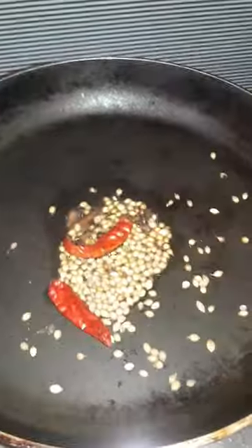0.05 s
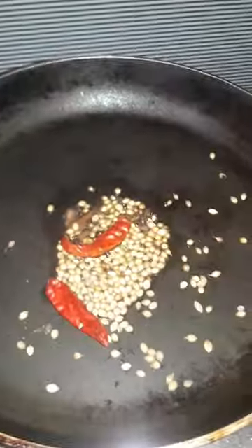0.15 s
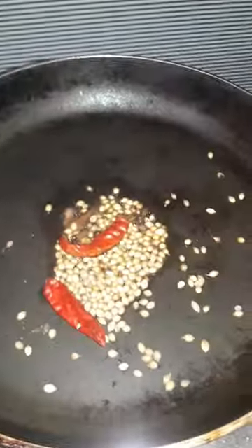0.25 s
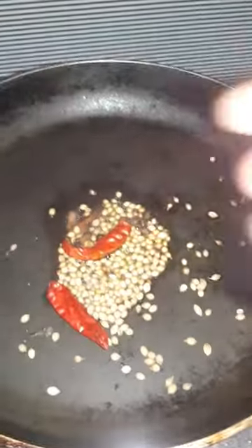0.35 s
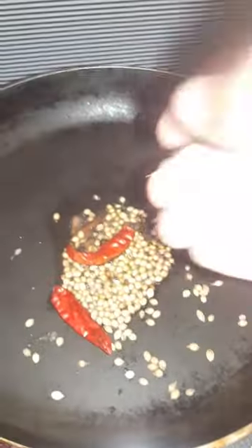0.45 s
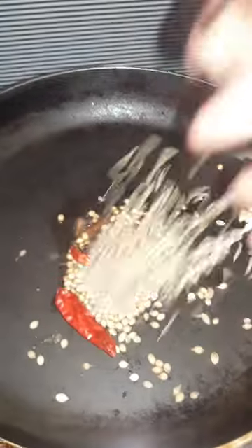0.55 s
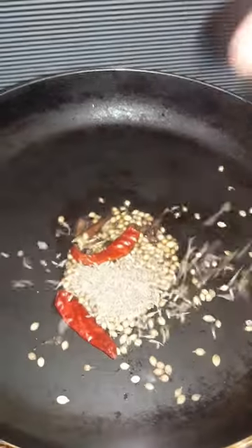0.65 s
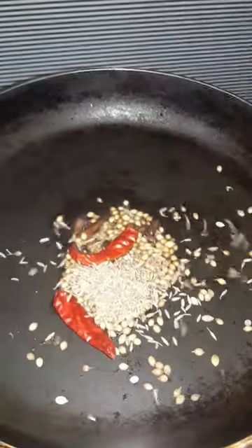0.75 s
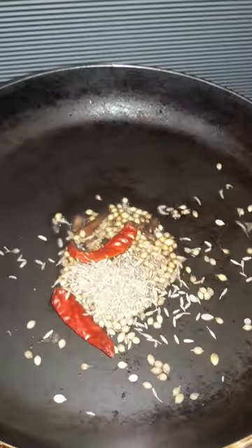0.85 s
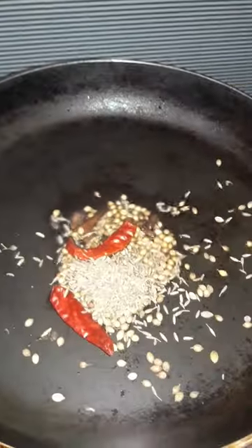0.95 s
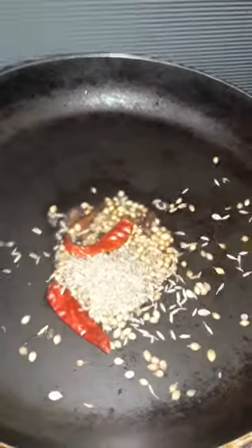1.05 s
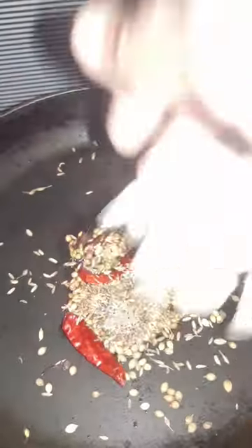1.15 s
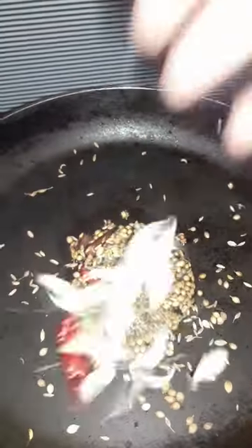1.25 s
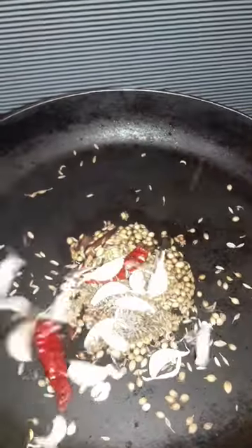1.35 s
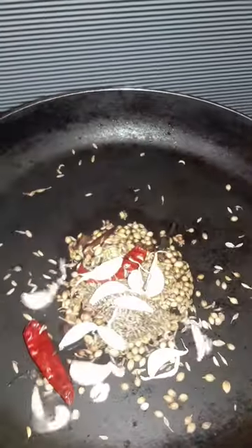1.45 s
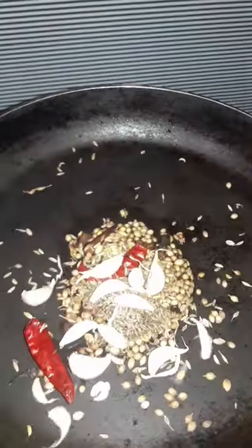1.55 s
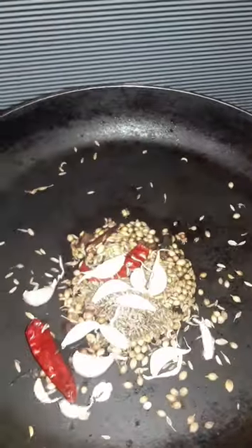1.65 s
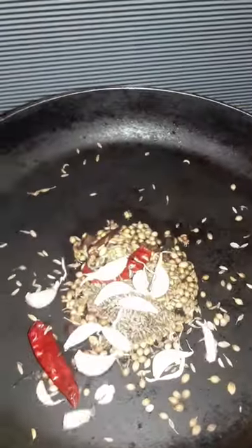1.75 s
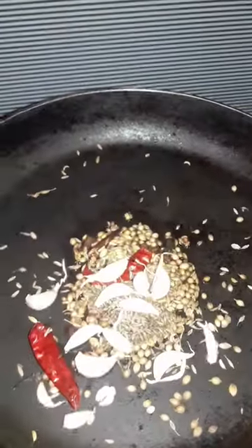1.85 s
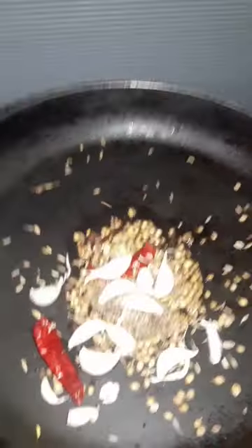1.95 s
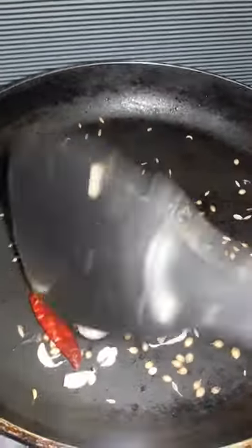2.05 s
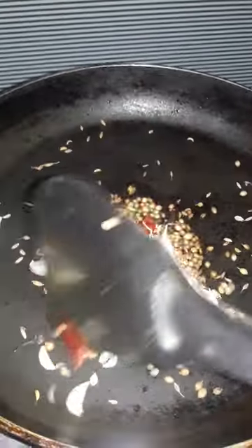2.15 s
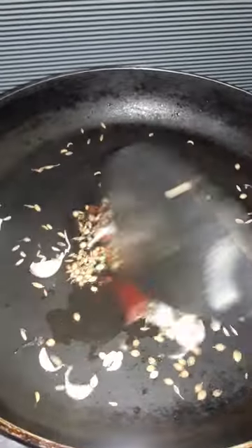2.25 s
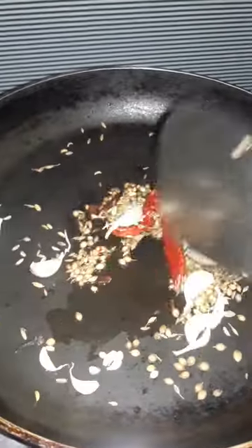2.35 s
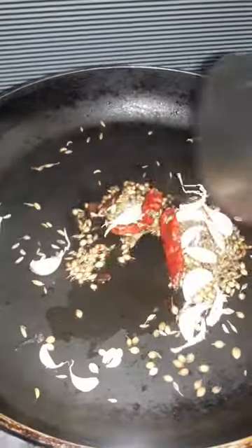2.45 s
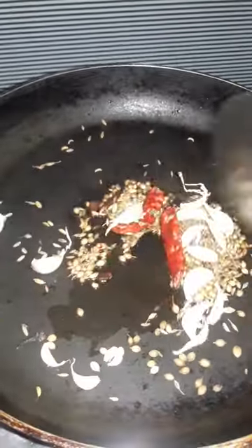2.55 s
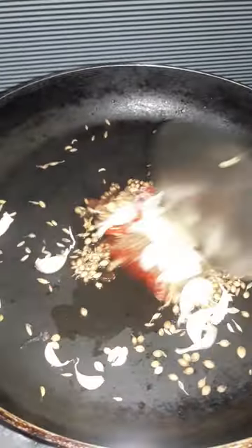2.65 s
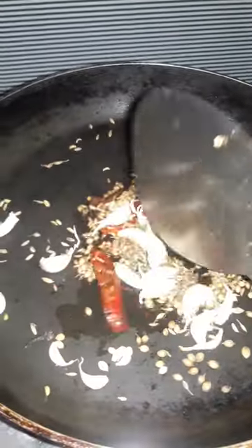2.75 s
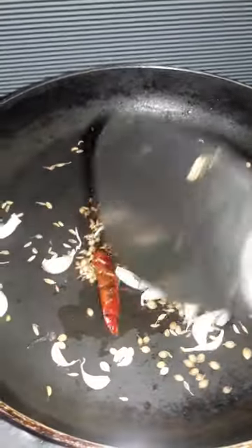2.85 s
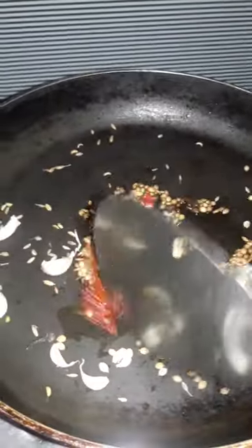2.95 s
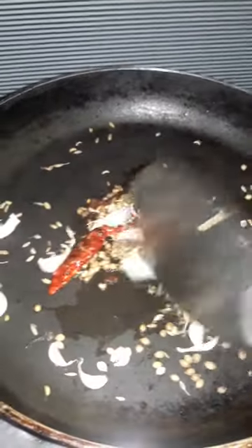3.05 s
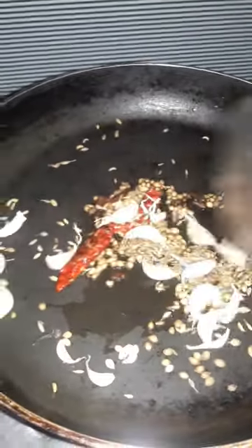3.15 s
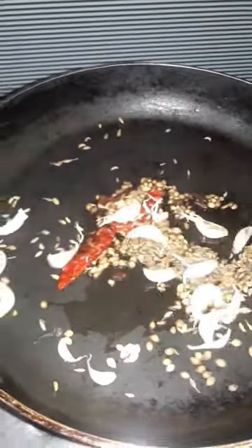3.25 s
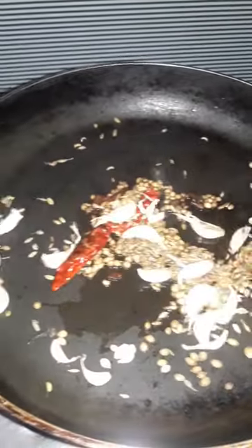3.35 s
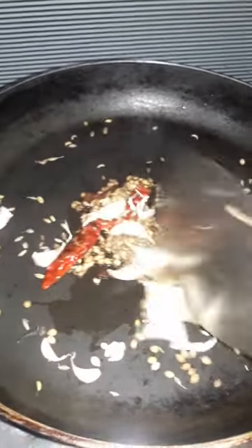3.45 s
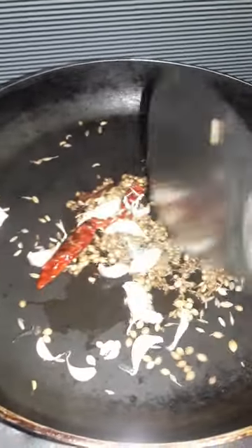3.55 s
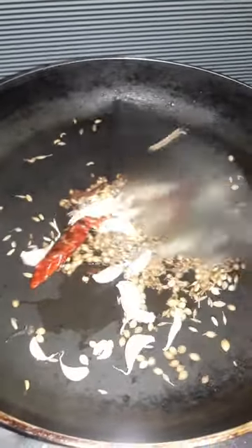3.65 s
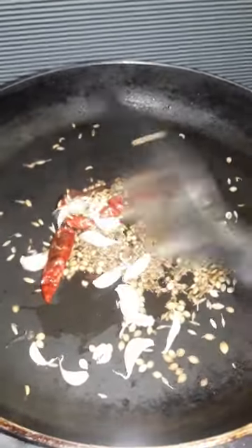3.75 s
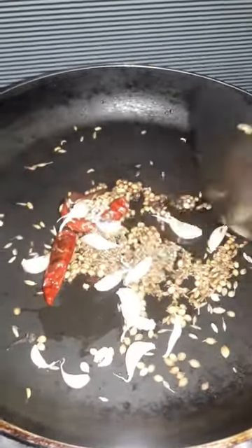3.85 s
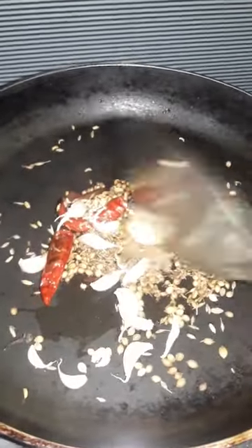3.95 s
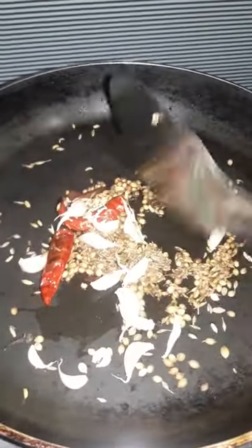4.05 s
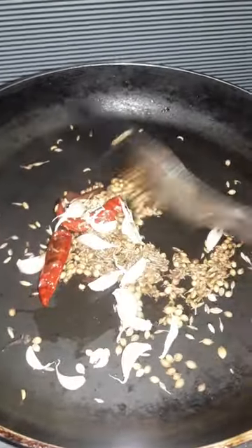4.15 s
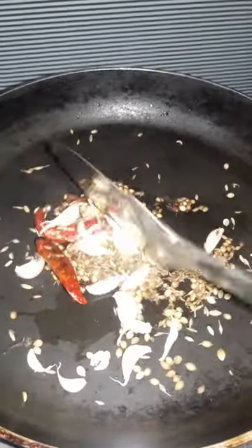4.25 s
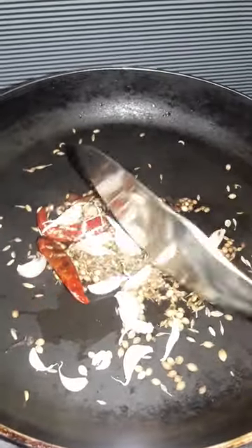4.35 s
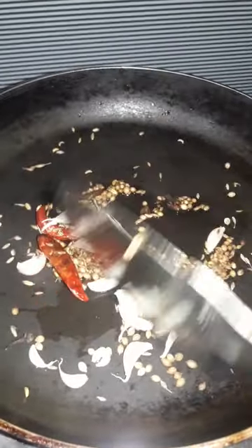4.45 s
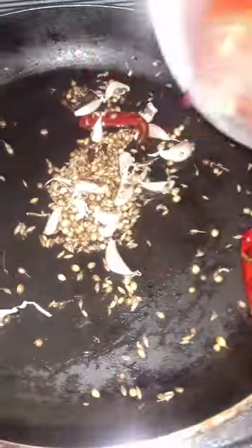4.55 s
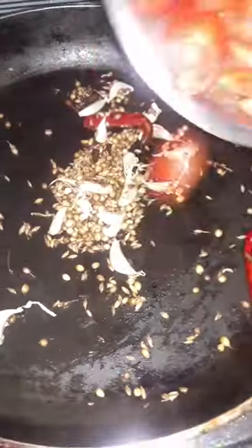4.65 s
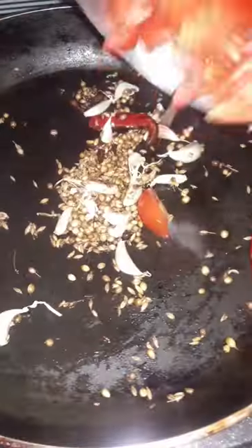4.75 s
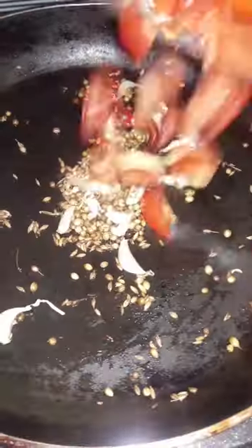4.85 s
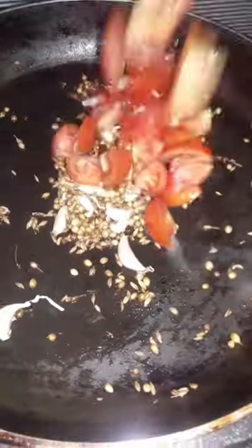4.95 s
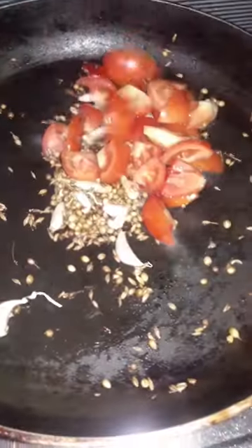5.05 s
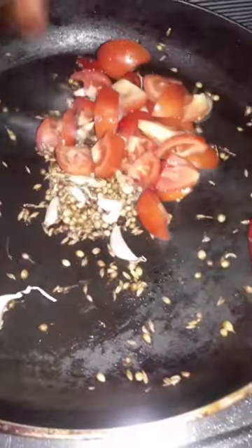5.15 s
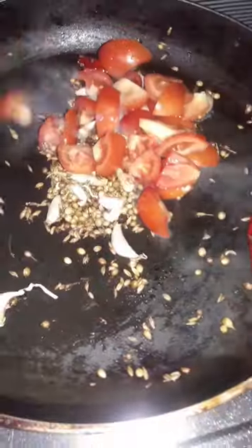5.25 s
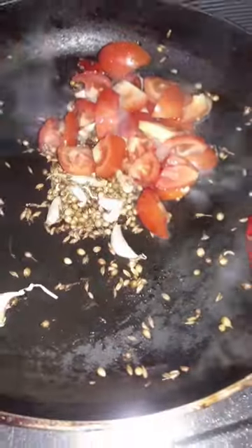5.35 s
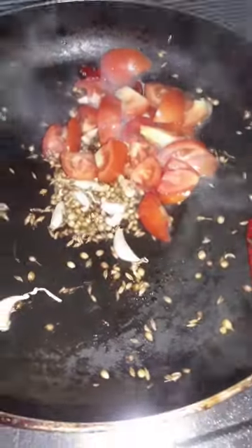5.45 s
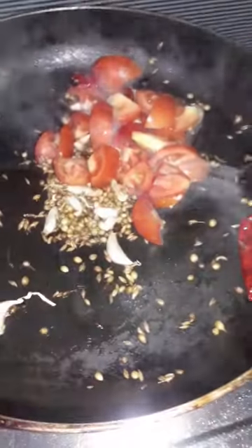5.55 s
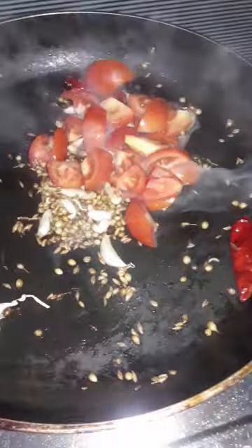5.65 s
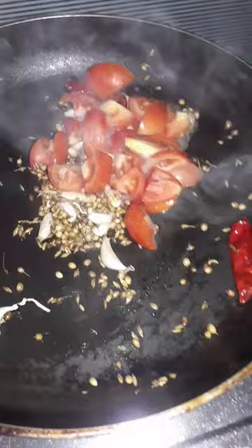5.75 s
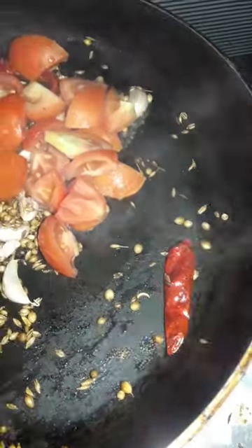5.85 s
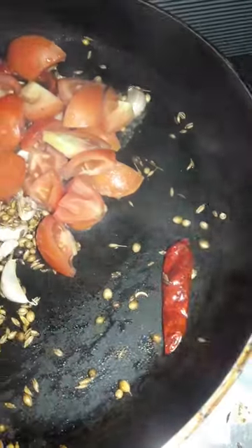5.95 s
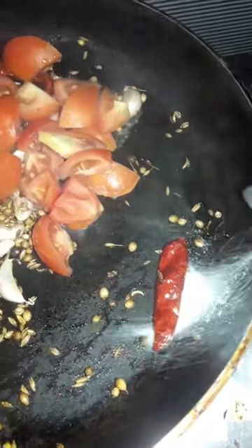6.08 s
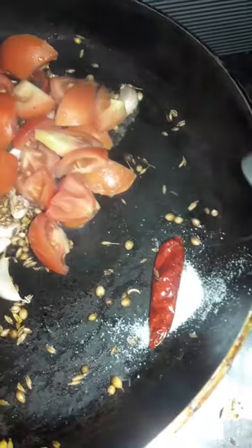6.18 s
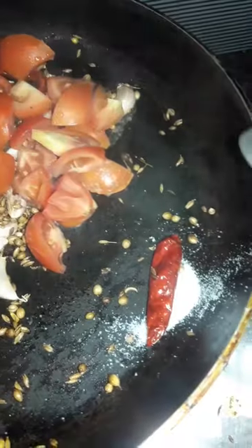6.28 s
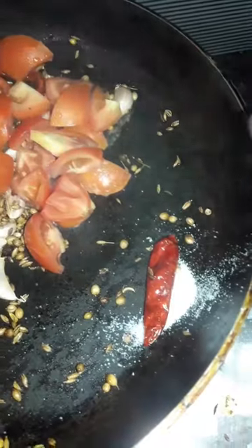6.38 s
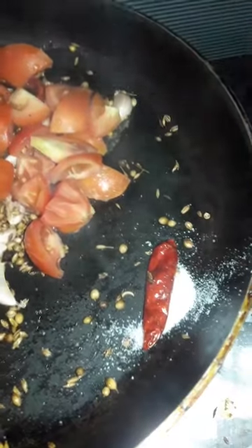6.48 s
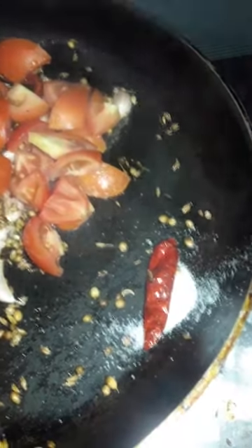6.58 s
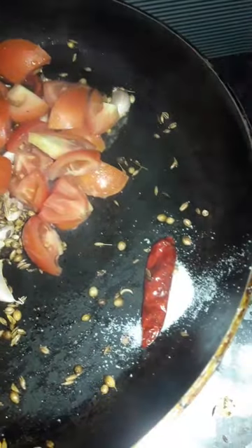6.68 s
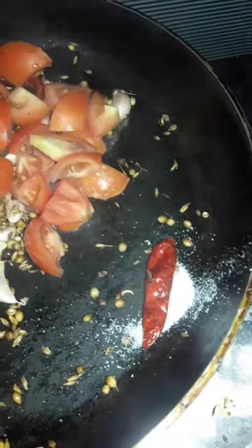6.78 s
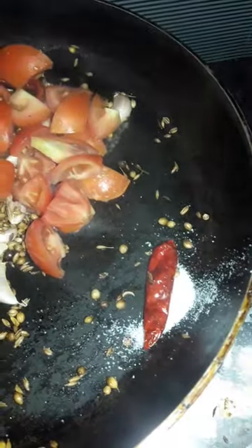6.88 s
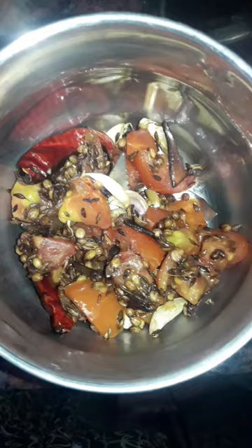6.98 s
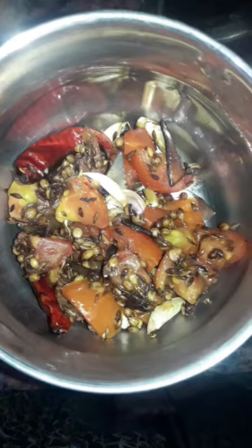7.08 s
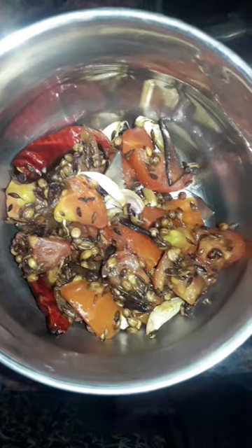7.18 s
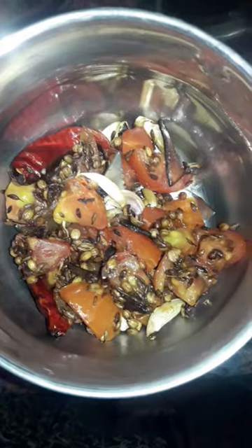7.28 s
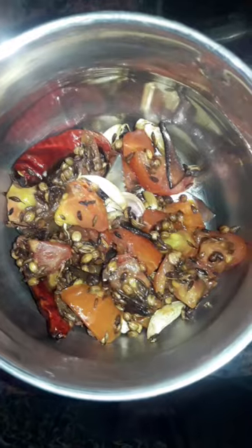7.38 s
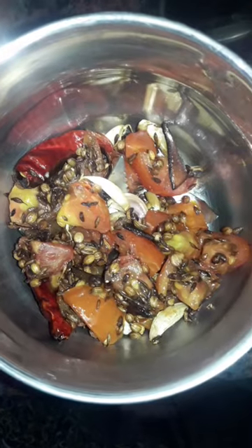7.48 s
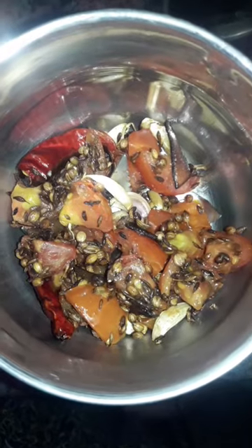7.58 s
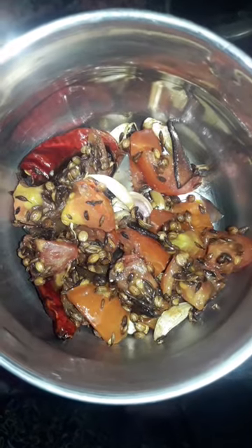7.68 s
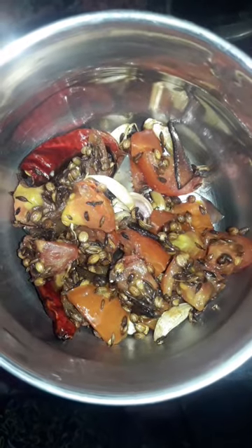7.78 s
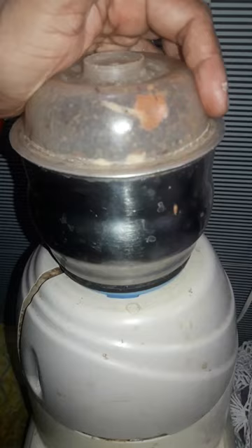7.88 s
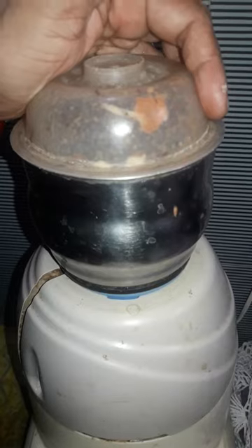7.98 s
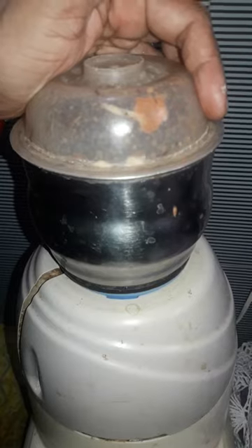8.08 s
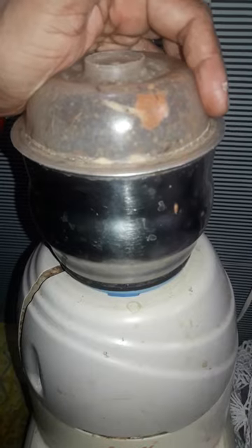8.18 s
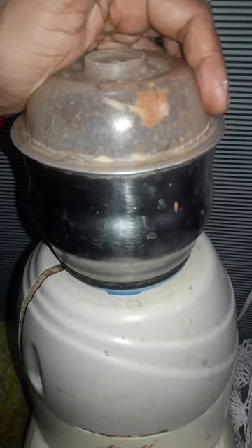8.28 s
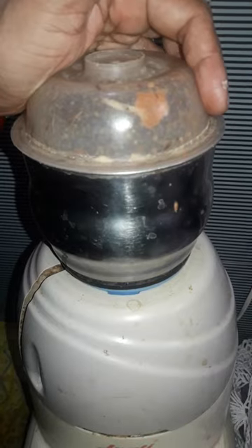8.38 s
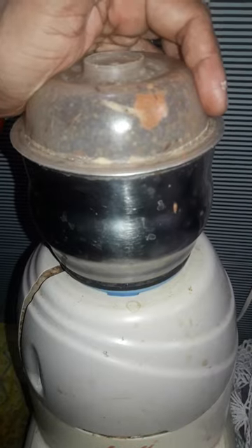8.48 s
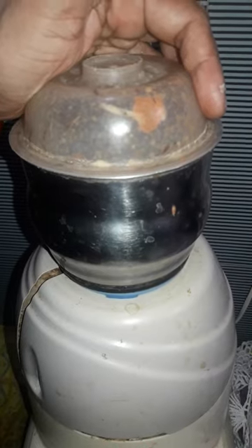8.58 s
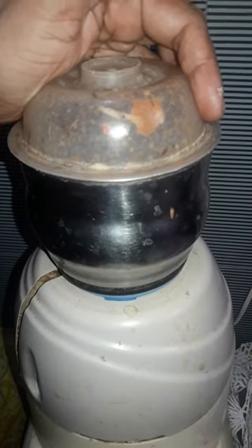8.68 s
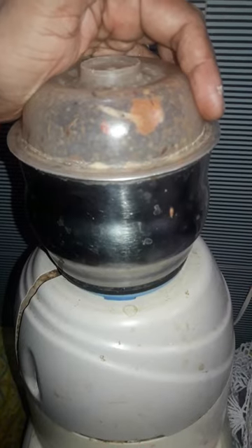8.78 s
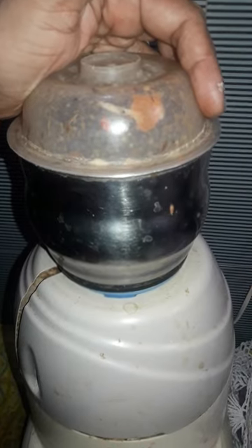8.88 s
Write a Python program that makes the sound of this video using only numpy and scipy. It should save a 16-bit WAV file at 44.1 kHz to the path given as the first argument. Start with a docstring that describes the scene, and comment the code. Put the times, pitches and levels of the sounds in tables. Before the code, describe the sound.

Close, dry home-kitchen sound over a steel pan. Two faint spoon taps and trickling seeds, a sharp spoon clack, then a bright ringing bowl clink and garlic pattering down. A spatula scrapes, ticks and knocks through the seeds. Wet tomato lands and bursts into loud steam hiss, easing slightly. An abrupt cut leaves dull room noise with small jar bumps, then a loud grinder runs steadily to the end.

```python
"""Two faint spoon taps and a trickle of seeds over soft room noise, close above a steel pan; hard cuts join the shots.
Seeds and garlic drop in, a small bowl clinks, a spatula knocks and scrapes, wet tomato bursts into a steam hiss,
a jar is handled quietly, then a grinder runs at full speed. Struck things are sums of decaying sine modes;
seeds, scrapes, steam and blades are grainy noise shaped by spectra and resonances. Both channels are alike."""
import sys
import numpy as np
from scipy import signal
from scipy.fft import rfft, irfft, next_fast_len
from scipy.io import wavfile
from scipy.ndimage import uniform_filter1d

SR = 44100
rng = np.random.default_rng(int(sys.argv[2]) if len(sys.argv) > 2 else 0)


def transcribe(u):
    """Save the signal u as a 16-bit wav file named by the first command-line argument.

    u: samples, shape (n,) or (channels, n), limited to [-1, 1]; the rate is SR.
    q: integer samples, one column per channel.
    """
    v = np.clip(np.atleast_2d(u).T, -1, 1)
    q = np.round(v * 32767).astype(np.int16)
    wavfile.write(sys.argv[1], SR, q)


def makeup_ratio(level_db):
    """Linear amplitude ratio for a level in decibels (20 dB per factor of ten)."""
    decades = np.asarray(level_db, float) / 20
    return 10 ** decades


N = 393372
T = np.arange(N) / SR


def evened(x):
    """Normalisation: scales a signal to rms 1."""
    return x / np.sqrt(np.mean(x ** 2) + 1e-20)


def read(points, hz):
    """Interpolation: reads a spectrum in dB on a log-frequency axis."""
    f, value = np.transpose(points)
    return np.interp(np.log(hz + 1), np.log(f + 1), value)


def colour(x, spectrum):
    """Linear filtering: weights the Fourier components by a spectrum, result at rms 1."""
    size = next_fast_len(len(x))
    gain = makeup_ratio(read(spectrum, np.fft.rfftfreq(size, 1 / SR)))
    return evened(irfft(rfft(x, size) * gain, size)[:len(x)])


def resonate(x, hz, width):
    """Resonance by heterodyning: shifts hz down to zero, smooths, and shifts back; gain 1 at the peak."""
    carrier = np.exp(2j * np.pi * np.cumsum(hz * np.ones(len(x))) / SR)
    r = np.exp(-np.pi * width / SR)
    return 2 * (carrier * signal.lfilter([1 - r], [1, -r], x / carrier)).real


def top(x):
    """High-pass filtering: the treble above 8500 Hz."""
    return signal.sosfilt(signal.butter(4, 8500 / SR * 2, "high", output="sos"), x)


def column(rows, k):
    """Linear interpolation: column k of a timed curve at every sample."""
    return np.interp(T, *np.transpose(rows)[[0, k]])


def level(rows, k=1):
    """Envelope: gain of a dB column, silent outside its span."""
    return makeup_ratio(column(rows, k)) * (T >= rows[0][0]) * (T <= rows[-1][0])


def grains(per_s, spread_db, wash):
    """Shot noise: random clicks of uneven size at rms 1, over a share of smooth noise."""
    size = makeup_ratio(spread_db * np.minimum(rng.exponential(1, N), 5))
    size *= rng.random(N) < per_s / SR
    return evened(size * rng.standard_normal(N)) + wash * rng.standard_normal(N)


def flutter(per_s, depth_db):
    """Random amplitude modulation: a gain wobbling by depth_db rms, noise smoothed over 1/per_s."""
    return makeup_ratio(depth_db * evened(uniform_filter1d(rng.standard_normal(N), max(int(SR / per_s), 2))))


# Joins between shots. Columns: start_s, silence_s
SHOT_CUTS = [(1.0445, 0), (2.0115, .001), (4.5095, .003), (5.785, .002), (6.9635, .010), (7.8845, .012)]


def add(mix, s, sound):
    """Superposition: adds a sound at s seconds; the next cut chops its ring."""
    end = min([c for c, _ in SHOT_CUTS if c > s] + [N / SR])
    part = mix[round(s * SR):round(end * SR)][:len(sound)]
    part += sound[:len(part)]


def swells(events):
    """Energy addition: gain of overlapping events that rise, then die away; their powers add."""
    power, t = np.zeros(N), np.arange(SR) / SR
    for s, db, rise_s, t60 in events:
        rise = np.minimum(t / max(rise_s, .001), 1)
        fade = makeup_ratio(db - 60 * np.maximum(t - rise_s, 0) / t60)
        add(power, s, (fade * rise) ** 2)
    return np.sqrt(power)


def struck(modes, events):
    """Modal synthesis: each tap rings a few short sine modes; brightness tilts them about 2000 Hz."""
    out, t = np.zeros(N), np.arange(SR // 4) / SR
    hz, db, t60 = np.transpose(modes)
    sines = np.sin(2 * np.pi * hz[:, None] * t)
    for s, peak_db, bright_db, damping in events:
        heights = makeup_ratio(db + bright_db * np.log2(hz / 2000))
        ring = heights @ (makeup_ratio(-60 * damping * t / t60[:, None]) * sines)
        attack = np.minimum(t / 0.00053, 1)
        add(out, s, makeup_ratio(peak_db) * ring / abs(ring).max() * attack)
    return out


# Room noise spectrum at the stove. Columns: freq_hz, gain_db
STOVE_SPECTRUM = [(30, -19), (90, -20), (160, -14), (300, -19.5), (560, -20.5), (605, -7), (650, -19.5),
                  (900, -20.5), (1500, -36), (2600, -37.5), (4500, -19), (6400, -16.5), (7500, -24),
                  (8700, -38), (11500, -26.5), (15500, -30)]
# Room noise spectrum by the jar. Columns: freq_hz, gain_db
JAR_SPECTRUM = [(18, -68), (30, -61), (86, -2), (127, -22), (189, -3.5), (245, -16), (287, -3), (345, -14),
                (437, -8.5), (2170, -19), (6550, -10.5), (7870, -26.5), (16000, -20)]
# Appliance hum at the stove. Columns: pitch_hz, level_db (relative)
STOVE_HUM_LINES = [(156.1, -55), (360.7, -65), (495.3, -66.5), (602.9, -69)]
# Appliance hum by the jar. Columns: pitch_hz, level_db (relative)
JAR_HUM_LINES = [(156.1, -55), (188.4, -44), (285.3, -66)]
# Middle of the room noise in the first three shots. Column: level_db
SHOT_MURMUR = [-53, -52, -60]


def air():
    """Stationary noise and tones: room noise and appliance hum, one pair at the stove, another by the jar."""
    def hum(lines):
        return sum(makeup_ratio(db + 2) * np.sin(2 * np.pi * hz * T) * flutter(20, 0.5) for hz, db in lines)

    stove = makeup_ratio(-48.5) * colour(rng.standard_normal(N), STOVE_SPECTRUM) + hum(STOVE_HUM_LINES)
    shot = np.searchsorted([s for s, _ in SHOT_CUTS], T)
    murmur_gain = np.append(makeup_ratio(SHOT_MURMUR), np.zeros(len(SHOT_CUTS)))[shot] * flutter(9.3, 0.5)
    murmur_spectrum = [(500, -29), (1100, -10), (3000, -9.5), (5000, -21)]
    stove += colour(rng.standard_normal(N), murmur_spectrum) * murmur_gain
    jar = makeup_ratio(-36) * colour(rng.standard_normal(N), JAR_SPECTRUM) * flutter(13, 0.75) + hum(JAR_HUM_LINES)
    jar_start_s, jar_end_s = SHOT_CUTS[4][0], SHOT_CUTS[5][0]
    return np.where(T < jar_start_s, stove, jar * (T < jar_end_s))


# Spectrum of seeds on steel. Columns: freq_hz, gain_db
SEED_SPECTRUM = [(500, -27), (1000, -13.5), (2000, -18), (3500, -5), (5000, 1.5), (6600, 4.5), (7500, -4),
                 (8600, -15), (11500, -5), (15500, -6)]
# Seeds thrown or pushed swell up and settle. Columns: start_s, level_db, rise_s, t60_s, treble_db (against level)
SEED_SCATTERS = [(0.0, -50, .01, 1.3, -4), (0.15, -50, 0.12, 1.2, 3), (0.436, -31.5, 0.0034, 0.27, -25),
                 (0.538, -32, 0.021, 0.83, -4), (0.935, -37.5, .012, 0.27, -11),
                 (1.017, -29, 0.0027, 0.16, 7), (1.045, -32.5, 0.0042, 0.26, -5),
                 (1.155, -44, .004, .5, -3), (1.17, -40, .012, .7, -12), (1.217, -32.5, .01, 0.49, -4),
                 (1.39, -42.5, .004, 0.87, -6), (1.54, -33, .004, 0.46, -10),
                 (1.632, -35.5, .004, 0.62, 1.5), (1.835, -26.5, 0.004, 0.25, -1),
                 (1.9, -26.5, 0.059, 0.2, -23), (2.075, -45, 0.16, 2, -3), (2.19, -37.5, .11, 0.66, -14),
                 (2.42, -34.5, 0.065, 1.7, -14), (2.6, -40, 0.048, 0.73, -3), (2.805, -42, .01, .35, 15),
                 (2.84, -42.5, 0.016, 0.39, 14), (2.89, -32, .01, 0.35, 4.5), (2.935, -32, .01, .3, -16.5),
                 (3.004, -28.5, .004, 0.39, -19), (3.24, -23, .004, 0.37, -3), (3.342, -40, .004, 2.3, -7),
                 (3.58, -40.5, 0.062, 0.81, -10), (3.74, -42, 0.052, .8, -8), (3.83, -34, 0.0044, 0.6, -4),
                 (4.05, -40.5, 0.14, 1.8, -4), (4.192, -36, .004, 0.93, -8), (4.27, -41, .02, 1.2, -9),
                 (4.4, -30, 0.028, 0.44, 3)]


def seeds():
    """Superposed random impacts: many tiny hits of seeds on steel, with the treble balanced per scatter."""
    patter = colour(grains(1800, 2.2, 1), SEED_SPECTRUM) * flutter(53, 0.75)
    bright = top(patter)
    body_gain = swells([row[:-1] for row in SEED_SCATTERS])
    bright_gain = swells([(s, db + top_db, rise_s, t60) for s, db, rise_s, t60, top_db in SEED_SCATTERS])
    return body_gain * evened(patter - bright) + bright_gain * evened(bright)


# Mode frequencies of the pan. Column: pitch_hz
PAN_PITCHES = [215, 285, 371, 479, 560, 711, 775, 813, 867, 910, 1011, 1030, 1421, 1497, 2079, 2118, 2851,
               2885, 2916, 3768, 3816, 4339, 4760, 4810, 5884, 6498, 7122]
# The same modes. Columns: level_db, t60_s (before damping)
PAN_MODES = [(-14, 0.58), (-9, 0.45), (-17, 0.46), (-14, 0.53), (-18, 0.28), (-12.5, 0.31), (-13, 0.35),
             (-3, 0.15), (-16, 0.29), (-14.5, 0.28), (-5.5, 0.23), (-12, 0.3), (-9.5, 0.17), (-20, 0.3),
             (-9, 0.15), (-12.5, 0.29), (-8.5, 0.15), (-11.5, 0.19), (-19, 0.21), (-13, 0.2), (-11, 0.22),
             (-18.5, 0.15), (-21, 0.25), (-14.5, 0.14), (-22.5, 0.27), (-24, 0.093), (-17.5, 0.067)]
# Seeds and cloves landing keep the pan ringing. Columns: start_s, level_db, rise_s, t60_s, patter_db (against ring)
PAN_LANDINGS = [(0.545, -44, 0.011, 0.76, 5.5), (1.195, -32, .005, 0.77, -12), (1.3, -32, 0.037, 0.54, -19)]
# The pan rocking on its trivet. Columns: start_s, level_db, rise_s, t60_s
PAN_ROCKING = [(0.0, -45.5, .004, 0.6), (1.5, -49.5, 0.036, 0.87), (1.9, -51, 0.037, .4),
               (4.12, -61, .08, 2.8), (4.165, -51, 0.03, 2.5), (6.03, -45, 0.012, 0.67)]


def pan_murmur():
    """Random excitation of modes: small impacts and rocking feed the pan without a clear blow."""
    t = np.arange(SR // 3) / SR
    modes = [(hz, makeup_ratio(db - 60 * t / t60) * np.sin(2 * np.pi * hz * t))
             for hz, (db, t60) in zip(PAN_PITCHES, PAN_MODES)]
    low = sum(mode * hz for hz, mode in modes if hz < 600)
    high = sum(mode for hz, mode in modes if hz > 1300)

    ringing = evened(signal.oaconvolve(grains(900, 3, .5), high * makeup_ratio(-300 * t))[:N])
    ringing *= swells([row[:-1] for row in PAN_LANDINGS])
    patter_spectrum = [(600, -20), (1050, -0.5), (1700, -8), (2600, 1), (3800, 4), (5500, -17)]
    patter = colour(grains(1500, 3.1, 0.61), patter_spectrum)
    patter *= swells([(s, db + dry_db, rise_s, t60) for s, db, rise_s, t60, dry_db in PAN_LANDINGS])
    rocking = evened(signal.oaconvolve(rng.standard_normal(N), low * makeup_ratio(-150 * t))[:N])
    return ringing + patter + rocking * swells(PAN_ROCKING)


# Modes of the spoon. Columns: pitch_hz, level_db, t60_s (at damping 1)
SPOON_MODES = [(876, -4, 0.054), (2083, 1, 0.07), (2235, 1.5, 0.03), (2525, -5, 0.046), (3600, -3, .04),
               (3960, -1, 0.051), (4270, 2, 0.084), (4385, 3.5, 0.043), (6250, -12, .07), (6740, -10, .07),
               (10530, -9, 0.069), (11800, -12, .05)]
# Spoon taps. Columns: start_s, level_db, brightness_db (per octave), damping (factor)
SPOON_TAPS = [(0.001, -23, 0.5, 0.81), (0.022, -26, -1, 0.76), (0.436, -7, -1, 1.4), (0.442, -10, 0.5, 1.4),
              (0.466, -26.5, -6, 0.43)]


def spoon_taps():
    """Modal vibration of a small bar: the spoon's short, closely damped modes."""
    return struck(SPOON_MODES, SPOON_TAPS)


def kitchen(knocks):
    """Reverberation: the walls return each shot's knocks as a short dull tail."""
    t, out = np.arange(SR // 2) / SR, np.zeros(N)
    tail = colour(rng.standard_normal(len(t)), [(200, -26), (900, -5.5), (3000, -3), (7000, -12.5)])
    tail *= makeup_ratio(-60 * t / 0.44) * np.minimum(t / 0.0063, 1)  # t60 and rise in s
    tail /= np.linalg.norm(tail)
    edges = [0] + [s for s, _ in SHOT_CUTS] + [N / SR]
    for a, b in zip(edges, edges[1:]):
        add(out, a, signal.oaconvolve(knocks[round(a * SR):round(b * SR)], tail))
    return makeup_ratio(-12) * out


# Single seeds, the spatula edge ticking, spits of water. Columns: start_s, level_db, pitch_hz, treble_db (against level)
TICK_EVENTS = [(0.4368, -17, 6550, -12), (0.942, -26.5, 6170, -14), (0.9704, -32, 6090, -13),
               (1.176, -22, 4140, -37), (1.2164, -15, 6890, -13), (1.340, -24, 3950, -26),
               (1.3937, -23, 5960, -20), (1.5436, -15, 5120, -11), (1.632, -14, 5090, -14),
               (1.8345, -11, 5450, -14), (1.9121, -9.5, 5560, -26), (2.4418, -31, 6630, -5),
               (2.4808, -16, 5100, -15), (2.5017, -9, 6750, -6), (2.6783, -22.5, 6670, -9.5),
               (2.7656, -27, 6700, -13), (2.811, -23, 6680, -9), (2.8953, -24, 6400, -3),
               (3.004, -13, 6700, -22), (3.242, -7.5, 4970, -14), (3.3445, -13, 5090, -4),
               (3.471, -28, 6700, -17), (3.516, -25, 6050, -18), (3.5954, -21.5, 6680, -10),
               (3.6285, -24, 6170, -16), (3.773, -23, 5200, -13), (3.8113, -21, 5330, -14),
               (3.8333, -13.5, 5200, 0), (4.0946, -27, 4550, -12), (4.1945, -17, 5400, -3),
               (4.2448, -20, 5260, -17), (4.2966, -26, 6800, -10), (4.3565, -27, 4630, -6),
               (4.4208, -15.5, 6700, -30), (4.4994, -24.5, 6560, -19), (4.714, -23, 6060, -6),
               (4.75, -6.5, 6740, -32), (4.808, -8, 6600, -23), (4.8293, 0.5, 6430, -15),
               (4.93, -8, 6960, -15), (7.4337, -25, 5080, -19), (7.7129, -24, 5940, -19)]


def ticks():
    """Impulsive impact: a sharp broad click with a short ring where it lands, one bounce, then a brief spray."""
    click_t60_s, bounce_s, bounce_db, spray_t60_s, spray_db = 0.007, .008, -4, 0.07, -12
    out, t = np.zeros(N), np.arange(SR // 6) / SR
    bounce = makeup_ratio(bounce_db - 60 * abs(t - bounce_s) / click_t60_s) * (t >= bounce_s)
    envelope = makeup_ratio(-60 * t / click_t60_s) + bounce + makeup_ratio(spray_db - 60 * t / spray_t60_s)
    for s, db, hz, top_db in TICK_EVENTS:
        burst = colour(rng.standard_normal(len(t)), SEED_SPECTRUM) * envelope
        bright = top(burst)
        body = burst + 1.7 * resonate(burst, hz, 570) - bright
        add(out, s, makeup_ratio(db) * (body / abs(body).max() + makeup_ratio(top_db) * bright / abs(bright).max()))
    return out


# Modes of the small bowl. Columns: pitch_hz, level_db, t60_s (at damping 1)
BOWL_MODES = [(940, 5.5, 0.97), (1503, 3.5, 0.19), (1924, 6, 0.16), (2090, 10.5, 0.14), (2190, -6, 0.39),
              (2670, -3, 0.22), (4340, -18, 0.091), (10900, -36, .06), (11500, -32, .06), (12100, -36, .05),
              (14100, -37, .06)]
# Bowl clinks. Columns: start_s, level_db, brightness_db (per octave), damping (factor)
BOWL_CLINKS = [(1.0177, -.5, 1.5, 1.3), (1.034, -4, 3.0, .8)]


def bowl_clinks():
    """Modal vibration of a shell: a long low mode under quickly dying higher ones."""
    return struck(BOWL_MODES, BOWL_CLINKS)


# Where strength, thud, ring and crack are heard. Column: freq_hz
BLOW_BANDS = [725, 352, 2720, 6800]
# Blows on the pan; food cushions the dull ones.
# Columns: start_s, strength_db, thud_db (against strength), ring_db (against strength), dullness (0-1)
PAN_BLOWS = [(1.1797, -26.5, -6.5, 11.5, 0.62), (1.3447, -46.5, -3, 8, 0.92),
             (2.5016, -20, -3.5, -14.5, 0.82), (2.5384, -17.5, -7, -4.5, 0.73), (2.9335, -32, 2, 1, 0.82),
             (2.936, -13.5, -15.5, 5, 0.59), (3.242, -18, -0.5, -8, 0.87), (3.3431, -19, 4, -5.5, 0.84),
             (3.901, -32.5, -20, -15.5, 0.9), (4.0938, -40.5, -27, -4, 0.78), (4.5, -41, 0, -5.5, 0.37),
             (6.0025, -29.5, -12, 0.5, 0.96)]


def pan():
    """Modal excitation: each blow rings the modes in its own mix; on food it gives more haze and dies sooner."""
    out, t = np.zeros(N), np.arange(SR // 2) / SR
    hz, (db, t60) = np.array(PAN_PITCHES), np.transpose(PAN_MODES)
    step = SR // 50  # loose food on the steel shifts each mode's level about every 20 ms
    for s, body_db, thud_db, ring_db, dull in PAN_BLOWS:
        bands_db = body_db + np.array([0, thud_db, ring_db, ring_db - 1.5])
        shape = sorted(zip(BLOW_BANDS, bands_db))
        damping = 0.95 + 0.58 * dull

        waver = np.repeat(rng.standard_normal((len(hz), len(t) // step)), step, axis=1)
        waver_db = 3.5 * uniform_filter1d(waver, size=step, axis=1)
        spot, phase = rng.standard_normal((2, len(hz)))  # luck of the place struck
        heights = makeup_ratio(db + read(shape, hz) + 1.5 * spot)
        sines = np.sin(2 * np.pi * hz[:, None] * t + 0.93 * phase[:, None])
        build = np.minimum(t * hz[:, None], 1)  # low modes take a cycle to build
        ring = heights @ (makeup_ratio(waver_db - 60 * damping * t / t60[:, None]) * sines * build)

        slope = [(120, bands_db[1] - 28.5), (200, bands_db[1] + 4)]
        slope += [(f, d - 3 * np.log2(f / 950)) for f, d in shape]
        slope += [(8800, bands_db[-1] - 41), (14000, bands_db[-1] - 44.5)]
        dense, crack = rng.standard_normal((2, len(t)))
        haze = colour(dense, slope) * makeup_ratio(-34 + 36 * dull - 60 * damping * t / 0.4)
        haze += colour(crack, slope) * makeup_ratio(-6 - 60 * t / 0.02)
        power = np.sqrt(np.sum(makeup_ratio(bands_db) ** 2))
        add(out, s, (makeup_ratio(4.5) * ring + power * haze) * np.minimum(t / .001, 1))
    return signal.sosfilt(signal.butter(2, 150 / SR * 2, "high", output="sos"), out)


# Flat of the spatula dragged. Columns: pitch_hz, width_hz, level_db, favoured_s (when the moving contact favours it)
FLAT_RESONANCES = [(1710, 90, -7, 1.65), (1980, 69, -1.5, 1.73), (2270, 30, -8, 1.78), (2530, 42, -1, 1.71),
                   (2860, 31, -0.5, 1.73), (3700, 26, 3.5, 1.785), (3970, 31, -6, 1.7), (4200, 64, -3, 1.7),
                   (4320, 45, -4, 1.86), (4840, 40, -1, 1.84), (6760, 50, -10, 1.65)]
# Its edge biting. Columns: pitch_hz, width_hz, level_db
EDGE_RESONANCES = [(770, 63, -12), (1038, 28, 1), (1180, 100, -4), (2650, 120, -9), (3680, 150, -11),
                   (4380, 92, -6), (4680, 40, 0), (6070, 120, -18), (6800, 200, 1)]
# The drag. Columns: start_s, level_db, pitch_hz (lowest blade resonance)
DRAG_CURVE = [(1.56, -65, 1550), (1.568, -34, 1600), (1.612, -56, 1380), (1.62, -33.5, 1360),
              (1.7, -33.5, 1300), (1.8, -35, 1320), (1.86, -35.5, 1150), (1.9, -42, 1110)]
# The bite. Columns: start_s, level_db
BITE_CURVE = [(1.9405, -33), (1.955, -33.5), (1.975, -33.5), (2.011, -40.5)]
# The spatula sliding softly over the steel. Columns: start_s, level_db, rise_s, t60_s
SOFT_SLIDES = [(2.08, -53, .03, 1.2), (2.16, -42, 0.039, 0.47), (2.24, -46, 0.025, 0.26)]
# A finger brushing the jar. Columns: start_s, level_db, rise_s, t60_s
JAR_BRUSHES = [(7.105, -41, .01, .3), (7.71, -41, .006, 0.23)]


def scrapes():
    """Stick-slip friction: uneven slips excite narrow resonances; the lowest glides as the blade tilts."""
    slips = grains(4000, 1.9, 1.1) * flutter(60, 1.3)

    def ring(hz, width, db):
        return makeup_ratio(db) * evened(resonate(slips, hz, width))

    flat = np.zeros(N)
    for hz, width, db, favoured_s in FLAT_RESONANCES:
        favour_db = -12 * np.minimum(((T - favoured_s) / 0.068) ** 2, 1)
        flat += ring(hz * flutter(16, 0.064), width, db) * makeup_ratio(favour_db)  # the pitch wanders slightly
    rasp = colour(slips, [(500, -6), (1200, 8), (2300, 3), (4500, 8), (8000, -26)])
    drag = makeup_ratio(-6.5) * flat + ring(column(DRAG_CURVE, 2), 45, -10) + 0.38 * rasp
    bite = 2.36 * evened(sum(ring(*peak) for peak in EDGE_RESONANCES)) + 0.44 * rasp
    soft = rasp * swells(SOFT_SLIDES + JAR_BRUSHES)
    return drag * level(DRAG_CURVE) + bite * level(BITE_CURVE) + soft


# Modes of the spatula held down. Columns: pitch_hz, level_db, t60_s (at damping 1)
BLADE_MODES = [(1050, -1, 0.033), (1300, -6, 0.027), (1720, -2, .03), (2030, 4, 0.031), (2310, 6, .03),
               (2800, -6, .03), (3300, -13, .03), (4120, 2, .03)]
# The blade catching on the steel. Columns: start_s, level_db, brightness_db (per octave), damping (factor)
BLADE_CATCHES = [(1.568, -26, -3, 1.1), (1.6192, -20, 3, .9), (1.6576, -23, -2, .8),
                 (1.834, -12.5, -4, 2.2), (1.9118, -13, 3, 2.2), (1.942, -17, -8, 1.4)]


def blade_catches():
    """Modal vibration of a clamped plate: heavily damped modes of the held blade."""
    return struck(BLADE_MODES, BLADE_CATCHES)


# Hiss spectrum on a wet surface. Columns: freq_hz, gain_db
WET_SPECTRUM = [(250, -85), (600, -30), (1100, -24.5), (1800, -17), (2800, -11.5), (4200, -0.5), (6100, 2),
                (7200, -5.5), (8700, -16.5), (11000, -11.5), (15500, -16.5)]
# Hiss spectrum on a drier surface. Columns: freq_hz, gain_db
DRIER_SPECTRUM = [(110, -53), (250, -21.5), (600, -24), (1100, -16.5), (1800, -26), (2800, -12.5),
                  (4200, -28), (6100, 3.5), (7200, -3.5), (8700, -33), (11000, -10.5), (15500, -6.5)]
# The pan singing under wet food. Columns: pitch_hz, width_hz, gain_db
SIZZLE_RESONANCES = [(603, 22, -2), (940, 150, 0), (1090, 30, 2), (1450, 84, 1), (2160, 78, -6),
                     (2860, 100, -4)]
# Steam hiss. Columns: start_s, level_db, dryness (0-1)
HISS_CURVE = [(4.7, -61, 0.5), (4.712, -33, 0.84), (4.76, -26, 0.66), (4.84, -24, 0.44), (4.88, -25.5, 0.8),
              (4.94, -19, 0.49), (5.09, -12, 0.23), (5.3, -11, 0.2), (5.5, -12.5, 0.52),
              (5.56, -12.5, 0.46), (5.86, -17, 0.44), (6.96, -18, 0.43)]


def steam():
    """Boiling noise: dense bursting on hot steel; the mids thin as dryness rises, and the damped pan sings."""
    fizz = grains(4000, 2.1, 1.9) * flutter(280, 0.73)
    dry_share = np.clip(column(HISS_CURVE, 2), 0, 1)
    hiss = (1 - dry_share) * colour(fizz, WET_SPECTRUM) + dry_share * colour(fizz, DRIER_SPECTRUM)
    hiss += sum(makeup_ratio(db) * resonate(hiss, hz, width) * flutter(6.9, 3.2) for hz, width, db in SIZZLE_RESONANCES)
    return hiss * flutter(21, 0.39) * level(HISS_CURVE)


# Modes of the pan damped by wet food. Columns: pitch_hz, level_db, t60_s (at damping 1)
LOADED_PAN_MODES = [(258, -8.5, 0.22), (750, -6, 0.33), (986, -6, 0.25), (1111, -2, 0.24),
                    (1520, -18, 0.16), (1940, -8, 0.29)]
# Tomato pieces landing, then a knock on the rim.
# Columns: start_s, level_db, brightness_db (per octave), damping (factor)
TOMATO_DROPS = [(4.704, -34.5, -4.5, 2.1), (4.827, -43, 1.5, 4), (4.862, -28, 0, 3),
                (4.903, -28, -0.5, 3.6), (6.0026, -12.5, 1.5, 1.3)]


def tomato_drops():
    """Mass-loaded modes: the pan's few low modes, damped by wet food."""
    return struck(LOADED_PAN_MODES, TOMATO_DROPS)


# Modes of the jar wall. Columns: pitch_hz, level_db, t60_s (at damping 1)
JAR_WALL_MODES = [(405, 1, .12), (559, 17, 0.18), (668, 14, 0.17), (812, 16.5, 0.06), (901, 16.5, 0.096),
                  (1020, 1, 0.1), (2110, -6, .3), (2230, -4, .2), (3480, -6, 0.18)]
# Fingers bumping the jar. Columns: start_s, level_db, brightness_db (per octave), damping (factor)
JAR_BUMPS = [(7.106, -24, 9.5, 0.96), (7.113, -14.5, 1.5, 0.85), (7.123, -12.5, -15, 1.7),
             (7.151, -18, 4, 1.3), (7.130, -29, 7, 1.1)]


def jar_bumps():
    """Modal vibration of a hollow vessel: fingers set off the wall modes."""
    return struck(JAR_WALL_MODES, JAR_BUMPS)


# Modes of the counter. Columns: pitch_hz, level_db, t60_s (at damping 1)
COUNTER_MODES = [(300, -10, .1), (726, 1, 0.089), (1030, 3, .1), (1280, 0, .08), (1773, 0, .07),
                 (2700, -13, .05)]
# Something light set on the counter. Columns: start_s, level_db, brightness_db (per octave), damping (factor)
COUNTER_SET_DOWN = [(7.712, -22, 4, 1.6), (7.718, -30, 0, 1.6), (7.728, -20.5, -3, 1.4)]


def counter_knocks():
    """Modal vibration of a damped slab: short low modes of the counter."""
    return struck(COUNTER_MODES, COUNTER_SET_DOWN)


# Shaft speed. Columns: start_s, speed_hz (turns per second)
SHAFT_SPEED = [(7.92, 275.2), (8.418, 276.8), (8.9, 275.2)]
# Shaft orders. Columns: multiple (of shaft speed), level_db (relative)
SHAFT_ORDERS = [(1, 1.5), (2, -16), (3, -16.5), (4, -20.5), (5, -12.5), (6, -27), (8, -18), (10, -16),
                (12, -25), (20, -20)]
# Filter of the blade noise. Columns: freq_hz, gain_db
CHURN_SPECTRUM = [(50, -60), (130, -42), (217, -23), (243, -23), (272, -13.5), (382, -25.5), (548, -19),
                  (823, -22), (901, -22.5), (1380, -17.5), (1900, -20), (2780, -16), (4270, -16.5),
                  (6000, -17), (8800, -49), (11400, -72)]
# Jar and lid resonances. Columns: pitch_hz, width_hz, gain_db
JAR_RESONANCES = [(810, 70, -3), (1000, 140, -5), (2230, 120, -1), (2440, 40, -8), (2790, 160, -1),
                  (3320, 80, -4), (3945, 110, -2), (5150, 120, -7), (5890, 380, 1.5), (6550, 140, -4)]
# Filter of the seeds striking the lid. Columns: freq_hz, gain_db
RATTLE_SPECTRUM = [(3000, -60), (7000, -17), (8800, -37), (10200, -3), (11500, 2), (12200, -2), (13200, 2),
                   (14000, -4), (15200, 5), (15800, -9)]
# Food in the blades. Columns: start_s, level_db
BLADE_LOAD = [(7.897, -13.5), (8.16, -12), (8.24, -13.5), (8.6, -13), (8.92, -17)]
# Hum of the motor winding. Values: pitch_hz, level_db (relative)
WINDING_HUM = (100, -55.5)


def grinder():
    """Rotating machinery: shaft orders over blade noise whose treble alone throbs once a turn, in lumps."""
    turn = 2 * np.pi * np.cumsum(column(SHAFT_SPEED, 1)) / SR
    tone = np.zeros(N)
    for k, db in SHAFT_ORDERS:
        tone += makeup_ratio(db + 0.5) * np.sin(k * turn + k * k) * flutter(30, 0.3 + 0.45 * min(k, 6))
    tone = signal.sosfilt(signal.butter(4, 170 / SR * 2, "high", output="sos"), tone)

    # hard bits pass the jar wall: throb of depth 0.62, lagging by 0.1 rad, above 4500 Hz
    food = grains(3500, 2, 1.8) * flutter(60, 0.8)
    lumps = flutter(70, 1.6) * (1 + .62 * np.cos(turn - .1))
    treble = signal.butter(3, 4500 / SR * 2, "high", output="sos")
    beaten = food + signal.sosfiltfilt(treble, food * (lumps - 1))
    churn = colour(beaten, CHURN_SPECTRUM)
    jar_ring = sum(makeup_ratio(db) * resonate(churn, hz, width) * flutter(17, 1.3) for hz, width, db in JAR_RESONANCES)
    churn = evened(churn + 1.27 * jar_ring)
    churn += makeup_ratio(-19) * colour(beaten, RATTLE_SPECTRUM) * flutter(43, 0.94)  # seeds strike the lid

    at_wall = np.diff(turn // (2 * np.pi), prepend=0) * rng.random(N) ** 3  # one hard bit a turn, mostly small
    snap = signal.oaconvolve(at_wall, np.hanning(7))[:N]
    churn -= makeup_ratio(7.5) * (snap - uniform_filter1d(snap, size=60))
    wall_hz, wall_width_hz, _ = JAR_RESONANCES[-2]  # each hit rings the strongest wall resonance
    churn += makeup_ratio(-10) * evened(resonate(at_wall, wall_hz, wall_width_hz))

    hum_hz, hum_db = WINDING_HUM
    hum = makeup_ratio(hum_db + 3.5) * np.sin(2 * np.pi * hum_hz * T)
    running = T >= BLADE_LOAD[0][0]
    return (tone * makeup_ratio(-18) + hum) * running + churn * level(BLADE_LOAD)


def scene():
    """Superposition: all sources add at one microphone, so both channels are alike."""
    knocks = spoon_taps() + ticks() + bowl_clinks() + pan() + scrapes() + blade_catches()
    knocks += tomato_drops() + jar_bumps() + counter_knocks()
    mix = air() + seeds() + pan_murmur() + knocks + kitchen(knocks) + steam() + grinder()
    return np.array([mix, mix])


def roll_off(x):
    """The treble ends steeply here."""
    return signal.sosfilt(signal.butter(12, 17000, fs=SR, output="sos"), x)


def record(dry):
    """Saturation and band limiting: a soft ceiling, the microphone's band, short silences at the joins."""
    held = dry / (1 + (dry / .95) ** 6) ** (1 / 6)
    held = signal.sosfilt(signal.butter(2, 60 / SR * 2, "high", output="sos"), held)
    low_pass = signal.firwin(1023, 15780, window=("kaiser", 8), fs=SR)
    held = signal.oaconvolve(held, low_pass[None], "same")
    is_open = np.prod([(T < s) | (T >= s + gap) for s, gap in SHOT_CUTS], axis=0)
    finished = held * uniform_filter1d(is_open * 1., size=24)
    return roll_off(finished)


dry = scene()
out = record(dry)
transcribe(out)
```